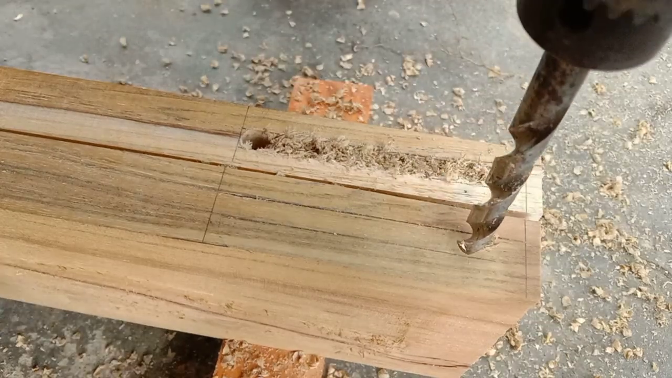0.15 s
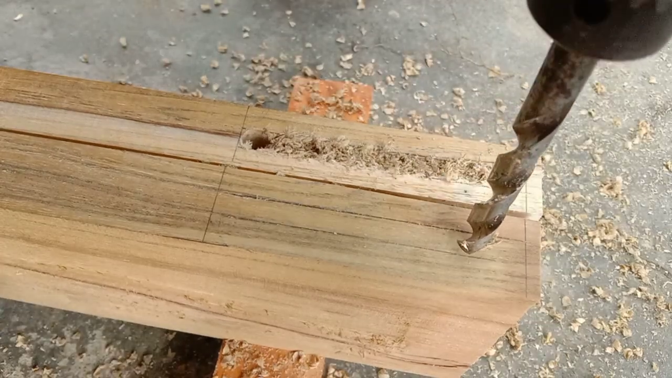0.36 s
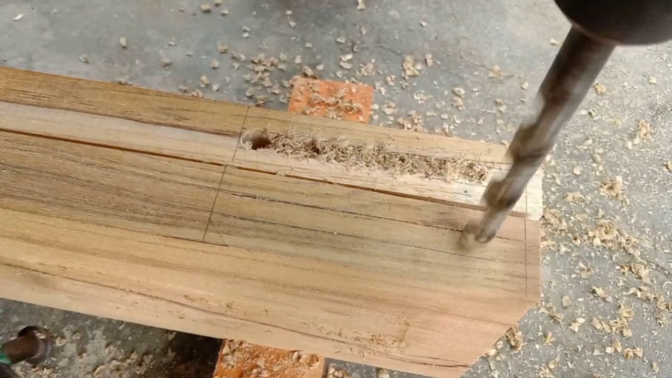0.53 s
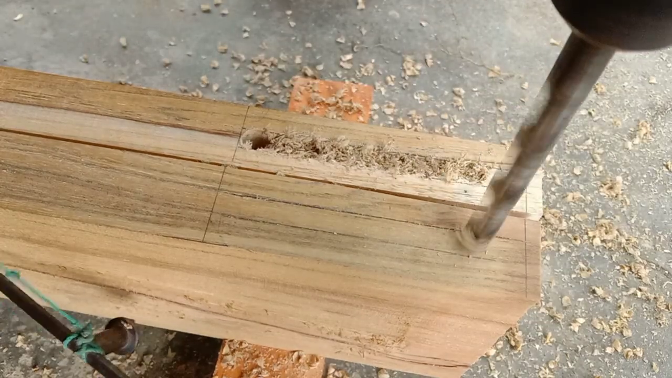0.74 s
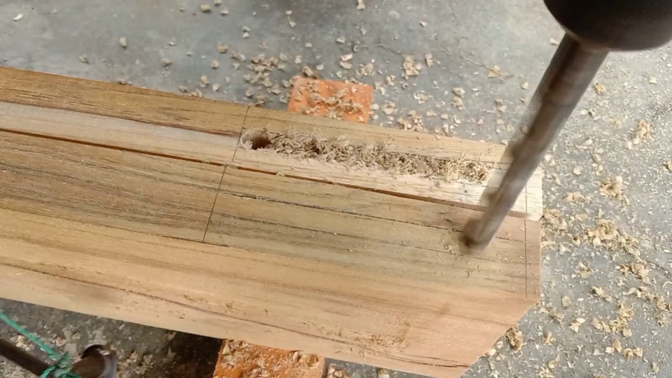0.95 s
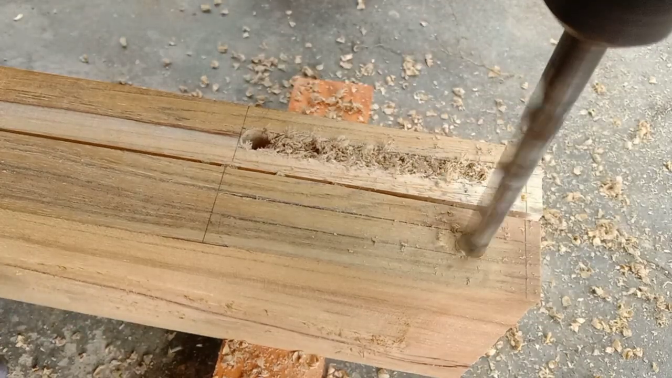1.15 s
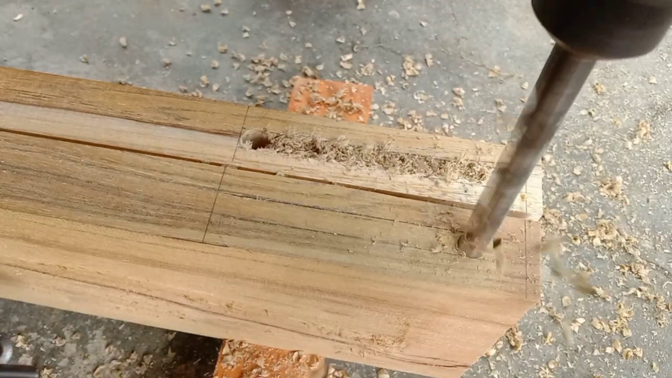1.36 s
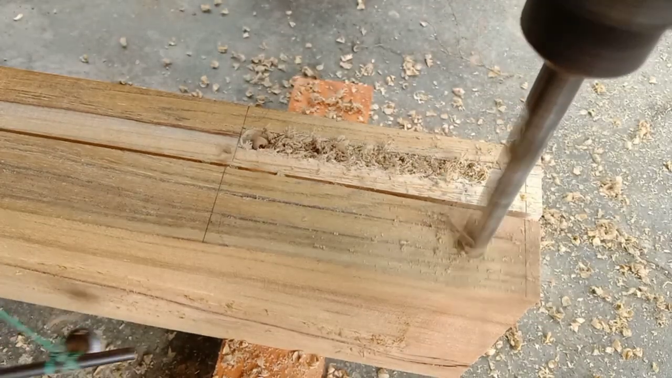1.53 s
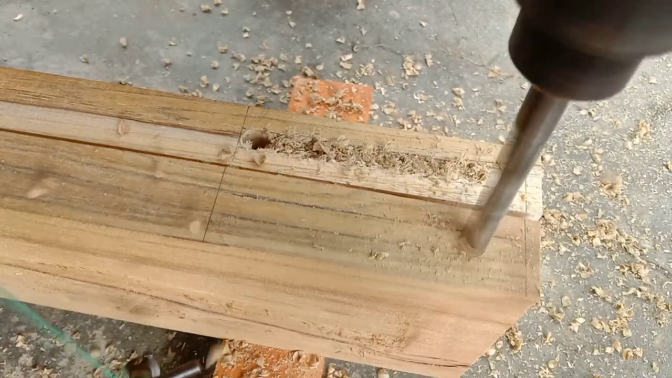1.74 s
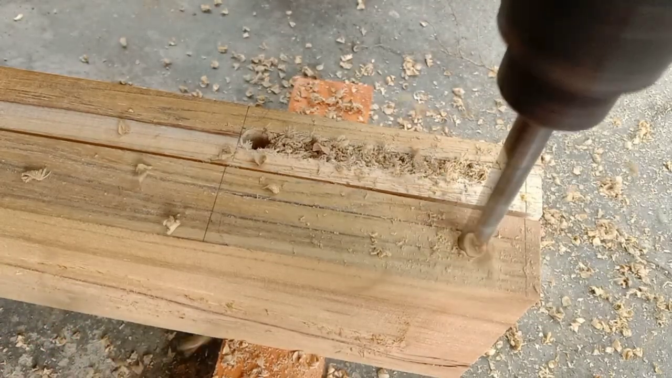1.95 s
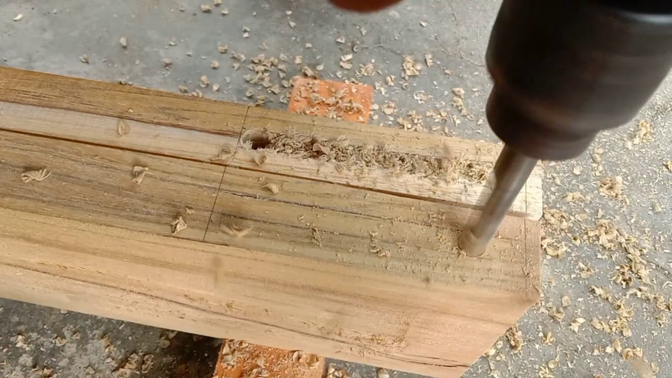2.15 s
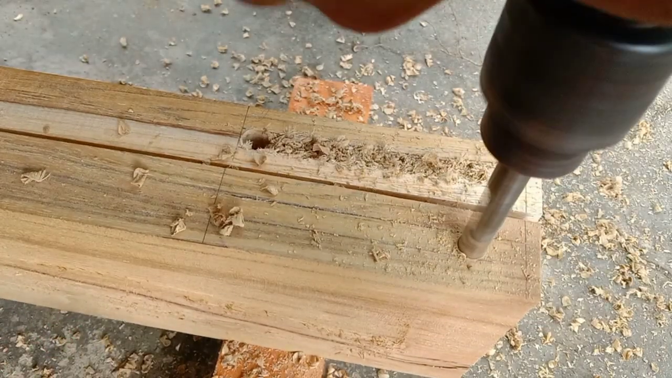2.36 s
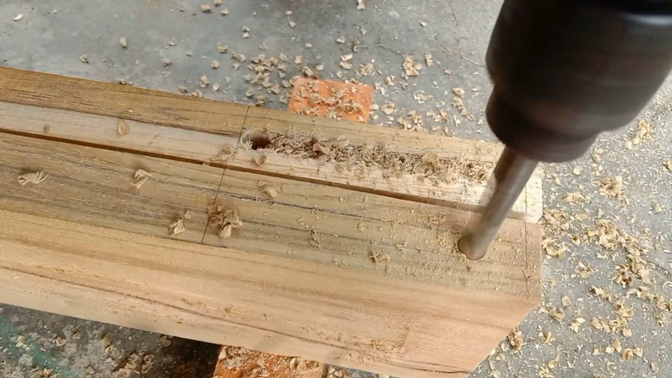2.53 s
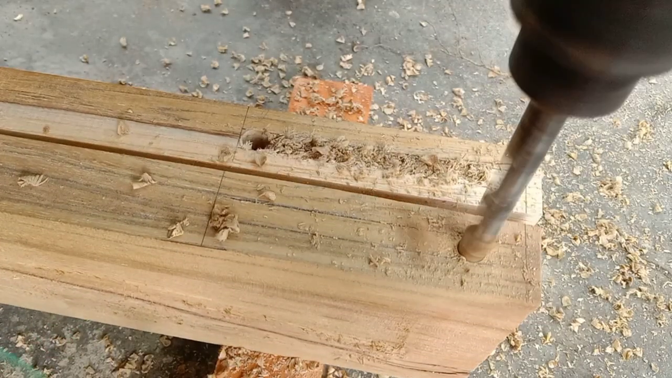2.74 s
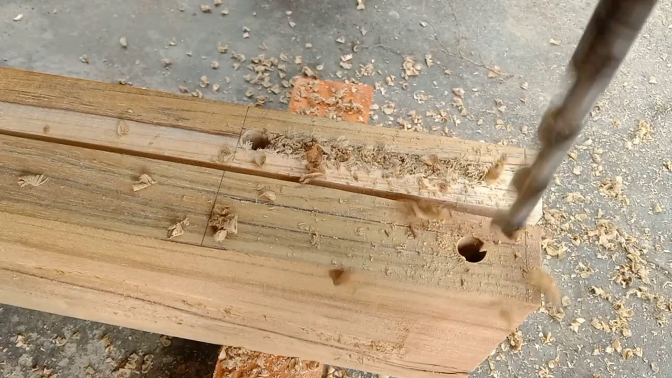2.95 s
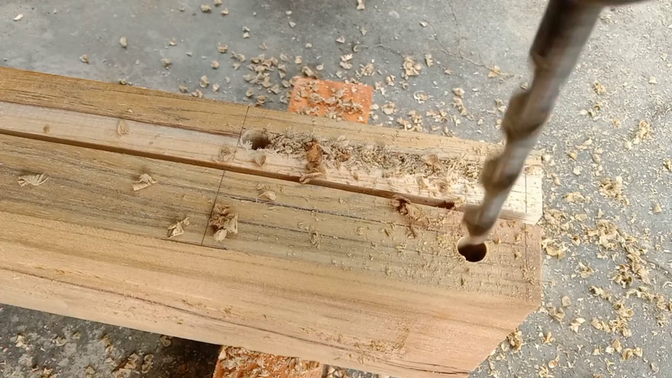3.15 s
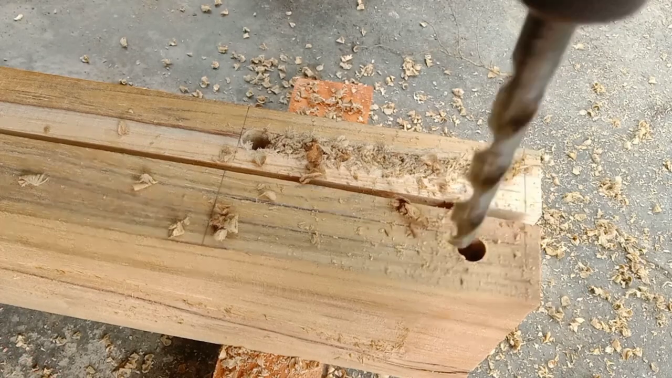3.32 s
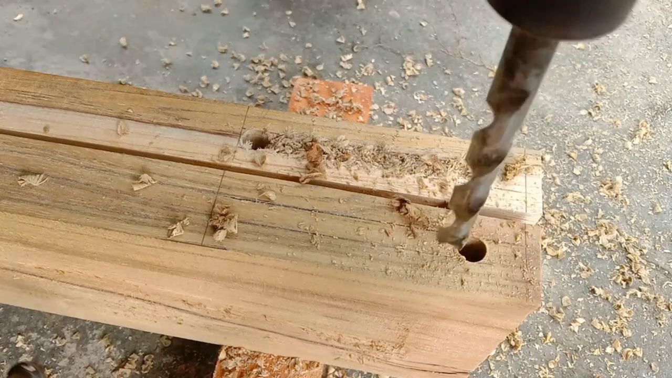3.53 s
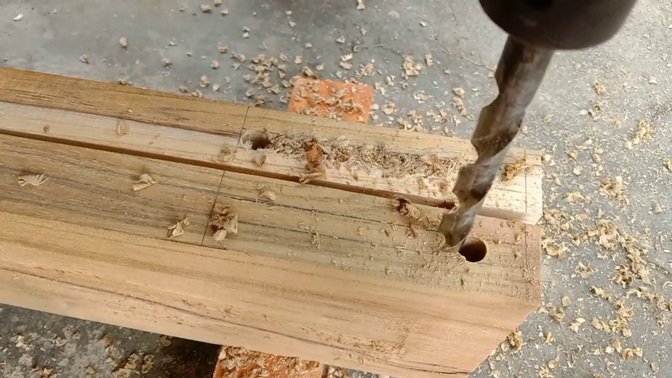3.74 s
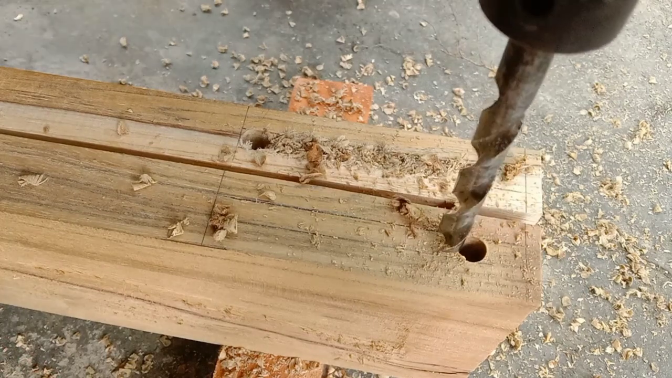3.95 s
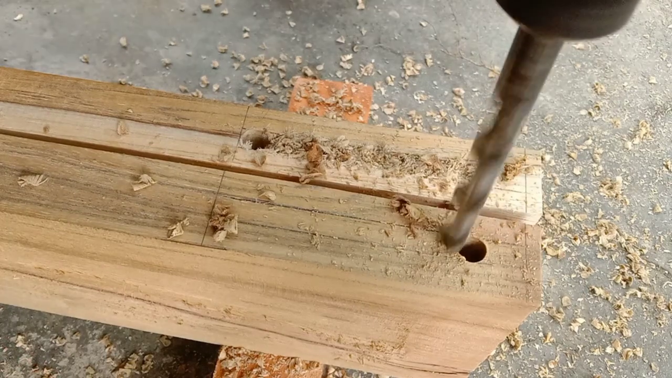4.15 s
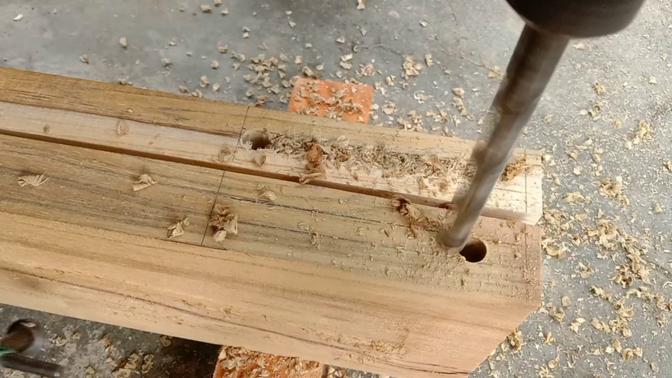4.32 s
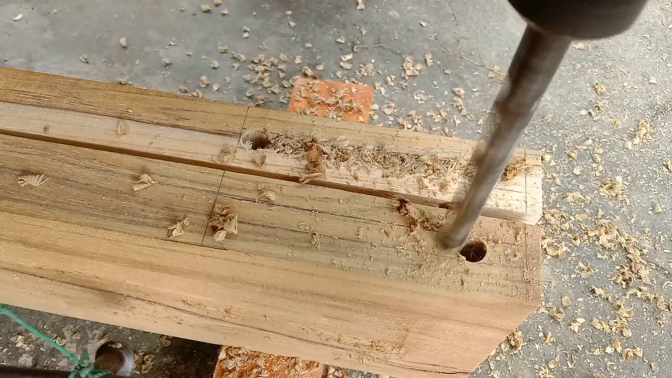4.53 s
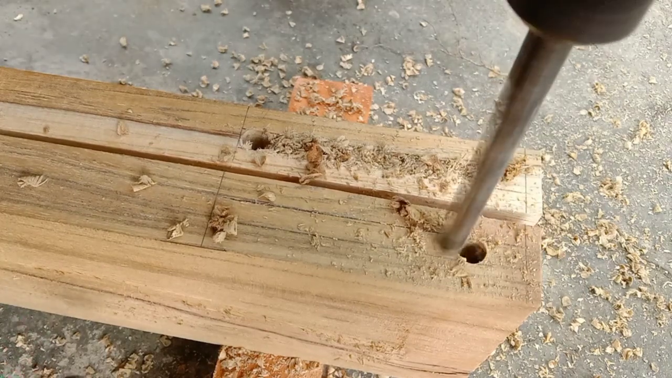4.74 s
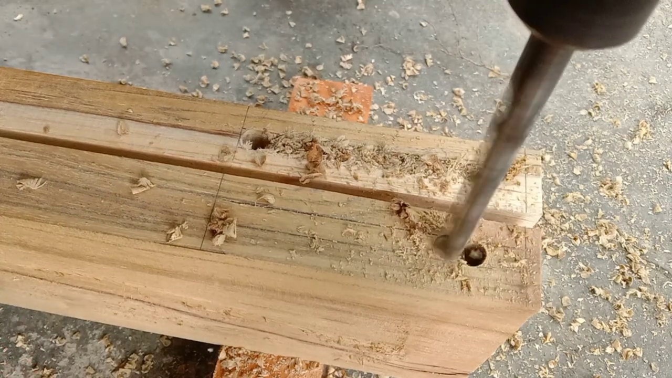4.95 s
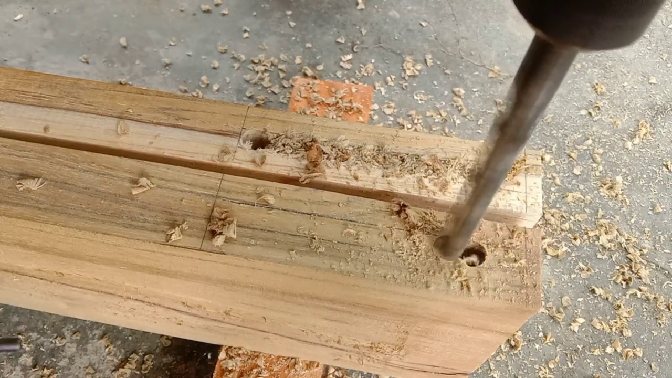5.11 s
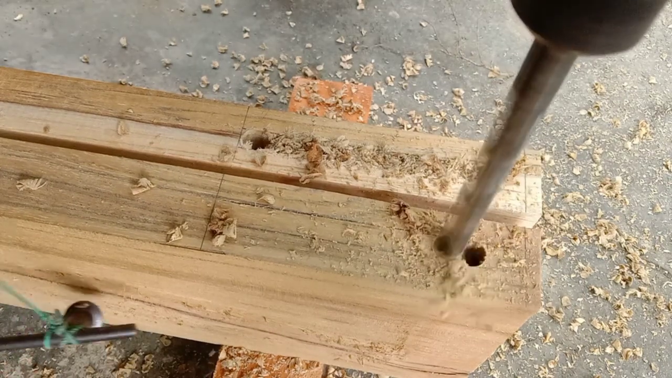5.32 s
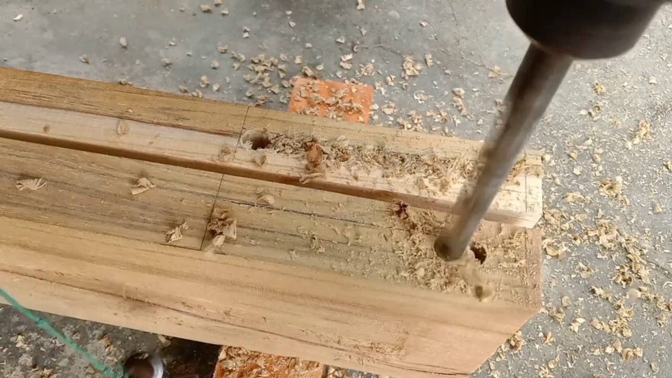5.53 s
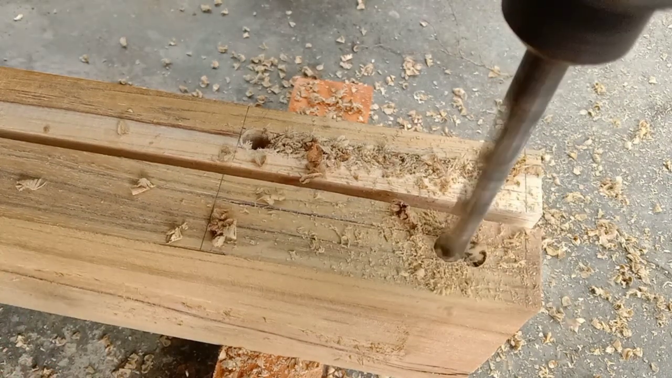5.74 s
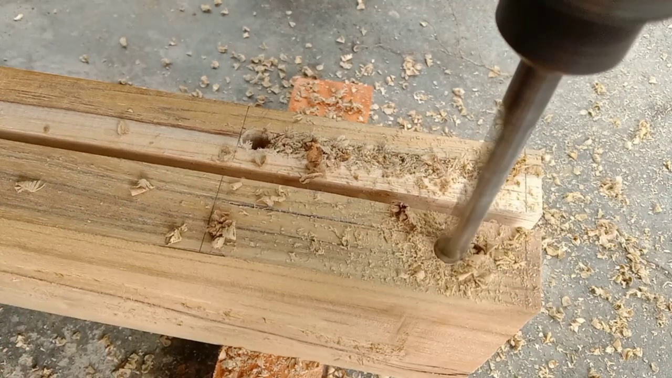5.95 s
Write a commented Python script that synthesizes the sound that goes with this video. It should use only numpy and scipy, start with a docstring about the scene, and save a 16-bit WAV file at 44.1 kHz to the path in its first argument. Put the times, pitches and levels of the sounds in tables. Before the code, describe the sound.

A quiet yard opens with faint, distant horn-like tones and soft wind on the microphone. At about 0.55 seconds a trigger clicks and a corded drill starts close by, its whine climbing until 1.3 seconds over grinding gears and a bright hiss. As the bit bores into a timber beam with a low growl, the pitch sags, lifts briefly near 2.5 seconds, then drops away. Around 3 seconds the bit comes out and the gears rattle loose as the motor coasts, thinning to small ticks that end by 3.8 seconds. Light wind puffs and one very faint far tone fill the short pause. At about 4.1 seconds the trigger clicks again, the gears knock, and the drill rises to full speed by 5 seconds. It keeps whining, hissing and grinding through the wood, dipping slightly, until the end at about 6 seconds.

```python
"""A corded drill bores two holes in a timber beam, outdoors, close to a small microphone.
Far horn-like tones and wind puffs open on a quiet yard. The trigger clicks and mains current jerks the
gears up to speed: teeth and commutator bars whine over gear grind and brush hiss. The motor sags in the
wood, the bit comes out near 3 s, and the gears rattle loose as it coasts. Wind and one far tone fill the
pause; near 4 s the trigger clicks again, the gears knock, and the drill bores on to the end."""
import sys
import numpy as np
from scipy import signal
from scipy.fft import rfft, irfft
from scipy.io import wavfile
from scipy.ndimage import uniform_filter1d

SR = 44100
rng = np.random.default_rng(int(sys.argv[2]) if len(sys.argv) > 2 else 0)


def unload_wav(signal):
    """Save mono or channel-first audio to the path in sys.argv[1] as 16-bit WAV at rate SR, clipped to [-1, 1]."""
    wavfile.write(
        sys.argv[1],
        SR,
        np.round(np.clip(np.atleast_2d(signal).T, -1, 1) * 32767).astype(np.int16),
    )


N = 268128
TIME = np.arange(N) / SR
TOP_HZ = 15550

# clank of the casing when slack gears or the switch ring it: (frequency [Hz], level [dB])
CLANK_SPECTRUM = [(550, -18.5), (1050, -0.5), (1500, -8.5), (2100, -21), (3000, -3.5), (3600, -30.5),
                  (4200, -38.5)]


def amp(db):
    """dB to gain."""
    return 10 ** (np.asarray(db) / 20)


def unit_rms(x):
    """Scales to rms 1."""
    return x / np.sqrt(np.mean(x ** 2) + 1e-20)


def level_at(spectrum, hz):
    """Level of a spectrum in dB, 25 dB down beyond its ends."""
    freqs, db = np.transpose(spectrum)
    return np.interp(np.log(hz + 1), np.log(freqs + 1), db, db[0] - 25, db[-1] - 25)


def curves(rows):
    """Each column after the time as a curve over the scene."""
    times, *columns = np.transpose(rows)
    return [np.interp(TIME, times, column) for column in columns]


def add(mix, start, sound):
    """Mixes a sound in at start seconds."""
    part = mix[round(start * SR):][:len(sound)]
    part += sound[:len(part)]


def drift(samples, size=N):
    """Random wander of rms 1, smoothed over that many samples."""
    return unit_rms(uniform_filter1d(uniform_filter1d(rng.standard_normal(size), samples), samples))


def noise(spectrum, grain_db=0., bursts=1):
    """Coloured noise of rms 1; grain makes single samples stand out, bursts shape it before it rings."""
    source = rng.standard_normal(N) * bursts * amp(grain_db * np.minimum(rng.exponential(1, N), 4))
    colour = amp(level_at(spectrum, np.fft.rfftfreq(N, 1 / SR)))
    return unit_rms(irfft(rfft(source) * colour, N))


def whine(tooth_hz, partials, flutter_db):
    """Wavering, fluttering sines, given as (multiple of the tooth rate, level in dB)."""
    cycles = np.cumsum(tooth_hz * (1 + .002 * drift(150) + .0008 * drift(1500))) / SR
    out = np.zeros(N)
    for order, db in partials:
        flutter = 2 * np.tanh((drift(1400) + drift(110)) / 2)
        tone = np.sqrt(2) * np.sin(2 * np.pi * (order * cycles + rng.random()))
        out += amp(db + flutter_db * flutter) * (order * tooth_hz < TOP_HZ) * tone
    return out


def yard():
    """A faint bed of outdoor air that drops near 4 s."""
    # colour of the air: (frequency [Hz], level [dB])
    spectrum = [(120, -34.5), (200, -13), (581, -10), (762, -10), (1330, 0), (2440, -14), (7800, -31),
                (9000, -44.5), (11700, -66.5), (19800, -120)]
    # fader of the bed: (time [s], level [dB])
    fader = [(0, -73), (3.98, -73.5), (4.02, -83)]
    return amp(curves(fader)[0]) * noise(spectrum)


def far_tones():
    """Horn-like harmonic notes that waver and flicker with distance."""
    # notes: (start [s], end [s], pitch [Hz], level [dB])
    notes = [(0, 0.297, 511, -55), (0, 0.328, 476, -59), (0, 0.116, 455, -62), (0.235, 0.421, 450, -58.5),
             (0.352, 0.475, 356, -61), (3.767, 3.9, 452, -68)]
    # colour of their harmonics: (frequency [Hz], gain [dB])
    colour = [(400, -16), (900, -14), (1400, -3), (1900, -32.5), (2700, -22.5), (3200, -30.5), (4300, -120)]
    out = np.zeros(N)
    for start, end, hz, db in notes:
        size = round((end - start) * SR)
        cycles = np.cumsum(hz * (1 + .007 * drift(900, size))) / SR
        note = np.zeros(size)
        for k in range(1, 10):
            flicker_db = 8 * np.tanh(drift(900, size))
            note += amp(level_at(colour, k * hz) + flicker_db) * np.sin(2 * np.pi * k * cycles)
        add(out, start, amp(db) * note * signal.windows.tukey(size, .4))
    return out


def wind():
    """Puffs of air rumble on the microphone over a faint steady breeze."""
    # puffs: (centre [s], length [s], level [dB])
    puffs = [(0.02, 0.15, -56), (0.363, 0.41, -63.5), (1.024, 0.32, -52), (1.3, 0.089, -56),
             (1.52, 0.11, -59), (1.88, .14, -62), (2.381, .45, -58), (3.11, 0.092, -47.5),
             (3.47, 0.088, -45), (3.789, 0.089, -54), (3.945, 0.087, -51.5), (4.27, 0.072, -55.5),
             (4.629, 0.5, -50.5), (5.03, .1, -54), (5.4, 0.34, -56), (5.851, 0.52, -56.5)]
    # rumble: (frequency [Hz], level [dB])
    spectrum = [(12, -59.5), (20, -24.5), (60, -0.5), (81, 3), (110, -3.5), (146, -23.5), (260, -33.5),
                (340, -73), (570, -120)]
    swell = sum(amp(db) * np.exp(-(2 * (TIME - centre) / length) ** 4) for centre, length, db in puffs)
    return (amp(-76) + swell) * noise(spectrum)


def trigger_clicks():
    """Each click of the switch is a bright snap over a clank of the casing."""
    # clicks: (time [s], level [dB])
    clicks = [(0.552, -45), (0.559, -34), (4.13, -27.5)]
    snap_t60_s, clank_t60_s = .08, .11
    out, t = np.zeros(N), np.arange(2500) / SR
    casing = noise(CLANK_SPECTRUM)[:len(clicks) * len(t)].reshape(len(clicks), -1)
    for (start, db), ringing in zip(clicks, casing):
        snap = amp(-12.5 - 60 * t / snap_t60_s) * rng.standard_normal(len(t))
        clank = amp(-60 * t / clank_t60_s) * np.minimum(t / .0051, 1) * ringing
        add(out, start, amp(db) * (snap + clank))
    return out


def gear_knocks():
    """Gears take up their slack with short dull rings; the last turns only tick."""
    # knocks: (time [s], level [dB])
    knocks = [(2.986, -12), (2.998, -15), (3.015, -15), (3.049, -21), (3.061, -16.5), (3.07, -13.5),
              (3.101, -18.5), (3.131, -18.5), (3.138, -17), (3.164, -19.5), (3.205, -22), (3.211, -22),
              (3.244, -24.5), (3.262, -30), (3.291, -27), (3.326, -28), (3.34, -24), (3.374, -21.5),
              (3.426, -24), (3.464, -24), (3.485, -29), (4.175, -14.5), (4.182, -18), (4.192, -12),
              (4.201, -15), (4.224, -19), (4.237, -31)]
    # casing modes: (frequency [Hz], level [dB], t60 [s])
    casing_modes = [(940, 0, .017), (1400, 2, 0.009), (2975, -11, 0.009)]
    out, t = np.zeros(N), np.arange(2500) / SR
    attack = (1 - np.exp(-t / .0012)) ** 2

    def ring(modes):
        """Each knock lands elsewhere and shifts the modes."""
        detune = 1 + .05 * rng.standard_normal()
        return attack * sum(amp(db - 60 * t / t60) * np.sin(2 * np.pi * hz * detune * t)
                            for hz, db, t60 in modes)

    for start, db in knocks:
        add(out, start, amp(db) * ring(casing_modes))
    tick_span_s, tick_gap_s = (3.535, 3.75), .014
    for start in np.arange(*tick_span_s, tick_gap_s):
        db = np.interp(start, tick_span_s, [-34, -45]) + 2.8 * np.tanh(rng.standard_normal())
        jitter = .35 * tick_gap_s * rng.standard_normal()
        add(out, start + jitter, amp(db) * ring(casing_modes[1:]))  # ticks miss the lowest mode
    return out


def wood_cut(load_db, restart_s):
    """The beam growls under the bit with the load, and falls away between the holes."""
    # the beam: (frequency [Hz], level [dB])
    spectrum = [(76, -28.5), (130, -13.5), (198, -12), (387, -2), (434, -3.5), (700, 4.5), (910, -30.5),
                (1540, -120)]
    bit_out = (TIME > 2.92) & (TIME <= restart_s)
    return amp(load_db - 17 - 23 * bit_out + .6 * drift(900)) * noise(spectrum)


def brush_hiss(tooth_hz, hiss_db, sizzle_db):
    """Brushes and cooling air hiss, topped by a flickering sizzle and thin whistles."""
    # hiss: (frequency [Hz], level [dB])
    spectrum = [(2530, -53), (4300, -31), (4810, 9.5), (5440, 9), (6430, 11.5), (7680, 11.5), (10100, -0.5),
                (10900, -12.5), (13300, -16.5), (15500, -9.5)]
    # brush whistles: (multiple of the tooth rate, level against the sizzle [dB])
    whistles = [(7, -13), (8, -9), (10, -10)]
    air = noise(spectrum, grain_db=4) * amp(.73 * drift(400))
    body = signal.oaconvolve(air, signal.firwin(61, 10700, fs=SR), "same")
    sizzle = amp(sizzle_db + 1.7 * drift(250)) * unit_rms(air - body)
    partials = [(k, sizzle_db + db - 40 * (k * tooth_hz < 9000)) for k, db in whistles]
    return amp(hiss_db) * unit_rms(body) + sizzle + whine(tooth_hz, partials, flutter_db=3)


def commutator_overtones(tooth_hz, bar_db):
    """Passing bars sing uneven overtones, the first boosted, with a squeal around 10 kHz."""
    # how the casing passes these tones: (frequency [Hz], gain [dB])
    casing = [(700, -14), (1000, -6), (2000, -4), (3200, -5), (4200, -20), (5000, -3), (6800, 0),
              (8000, -3), (10000, -12), (11500, -24), (15500, -24)]
    bars_per_tooth, squeal_order = 3, 10
    orders = bars_per_tooth * np.arange(2, 15)
    trims_db = [3, *(3 * np.tanh(rng.standard_normal(12)))]
    partials = [(k, bar_db + db + level_at(casing, k * tooth_hz)) for k, db in zip(orders, trims_db)]
    squeal_hz = squeal_order * tooth_hz
    off_band = (squeal_hz < 9300) | (squeal_hz > 10700)
    partials.append((squeal_order, bar_db - 8 - 40 * off_band))
    return whine(tooth_hz, partials, flutter_db=5.2)


def gear_grind(tooth_hz, load_db, jerk_depth):
    """Loaded gears grind evenly; jerked or slowly coasting, they run slack and ring the casing."""
    # gearbox: (frequency [Hz], level [dB])
    spectrum = [(380, -43), (650, -2), (741, -7), (804, 6), (995, 11.5), (1310, 16), (2100, 8.5),
                (3180, 10.5), (4040, -1.5), (4600, -1), (5980, -47), (10100, -120)]
    # each half wave of the mains jerks the rotor, so the grind comes in uneven bursts
    pulse_hz = 100
    pulses = np.exp(2.4 * np.cos(2 * np.pi * pulse_hz * (TIME - .009)))
    jerks = unit_rms(pulses * amp(3 * np.tanh(drift(300))))
    bursts = 1 - jerk_depth + jerk_depth * jerks
    grind = amp(.8 * drift(540)) * noise(spectrum, grain_db=1.24, bursts=bursts)
    rattle = noise(CLANK_SPECTRUM, grain_db=3, bursts=bursts)
    slack = .85 * np.maximum(jerk_depth / .65, np.clip(1.6 - tooth_hz / 300, 0, 1))
    return amp(load_db) * (np.sqrt(1 - slack ** 2) * grind + slack * rattle)


def gear_and_bar_whine(tooth_hz, accel, load_db, bar_db, jerk_depth, flutter):
    """Gears whine at 1, 2 and 4 times the tooth rate; the commutator's lowest tone sits at 3 times."""
    # how the casing passes these tones: (frequency [Hz], gain [dB])
    casing = [(400, -55), (800, -35.5), (1050, -27), (1300, -29), (1620, -41.5), (2200, -48.5), (2600, -41),
              (3050, -23.5), (3300, -21.5), (3600, -31), (4200, -41), (4800, -36), (5400, -32.5),
              (6400, -28), (8000, -18)]
    # trims of harmonics 1 (gears), 3 (commutator) and 4 (gears): (gain [dB])
    trims_db = [-1.8, 42, 0]
    # fader of harmonic 2: (time [s], level [dB])
    second_fader = [(.6, -43), (.85, -25.5), (.93, -24), (1.1, -31), (1.27, -32.5), (1.6, -29.5),
                    (1.9, -46), (2.1, -52), (2.42, -54), (2.55, -32), (2.65, -60), (2.73, -32), (2.95, -31),
                    (3.03, -67), (4.15, -84), (4.4, -44), (4.63, -27), (4.9, -35.5), (5.3, -41.5),
                    (6.08, -33)]
    # side tones: (multiple of the tooth rate, level against harmonic 4 [dB])
    side_tones = [(.5, -19), (5, -22)]
    full_load_db, free_hz = -24.5, 420
    parting = 5 * (1 - tooth_hz / free_hz)  # below free_hz the teeth part and the gear whine dies
    contact_db = .18 * (load_db - full_load_db) - 35 * np.clip(parting, 0, 1)
    breakup_db = -90 * np.maximum(jerk_depth - .43, 0)
    # braking in the wood throws the teeth on their other flank
    braking = uniform_filter1d(np.clip(-accel / 2000, 0, 1) ** 2, size=6000, origin=2500)
    drive_db = {1: contact_db + .5 * braking,
                3: bar_db + breakup_db - 35 * (tooth_hz < free_hz) - 12.5 * braking,
                4: contact_db + breakup_db - 11 * braking}
    level_db = {k: drive_db[k] + db + level_at(casing, k * tooth_hz) for k, db in zip(drive_db, trims_db)}
    level_db[2] = curves(second_fader)[0] - 35 * np.clip(parting - 1, 0, 1)
    body = whine(tooth_hz, [(k, level_db[k]) for k in (1, 2, 3)], flutter_db=3.5)
    edge = whine(tooth_hz, [(k, level_db[4] + db) for k, db in [(4, 0), *side_tones]], flutter_db=3)
    return (1 - jerk_depth) ** 2 * body + flutter * edge


def drill():
    """The motor's speed and load drive the cut, the hiss, the grind and the whines."""
    # motor speed, one list a hole: (time [s], tooth rate [Hz])
    speed = [
        [(0.56, 274), (0.66, 644), (0.752, 967), (0.86, 1200), (0.996, 1406), (1.14, 1520), (1.266, 1583),
         (1.348, 1620), (1.582, 1525), (1.896, 1330), (2.156, 1111), (2.244, 1050), (2.394, 995.4),
         (2.464, 1082), (2.575, 1187), (2.642, 1037), (2.742, 721), (2.856, 534.1), (2.946, 427), (3.2, 297.1),
         (3.452, 169), (3.78, 38.1)],
        [(4.17, 340.3), (4.254, 765), (4.344, 1091), (4.466, 1371), (4.626, 1488), (4.792, 1582), (4.908, 1613),
         (5.08, 1640), (5.26, 1651), (5.532, 1641), (5.8, 1589), (6.08, 1526)],
    ]
    # motor effort, one list a hole: (time [s], gear load [dB], hiss [dB], sizzle [dB], commutator [dB])
    effort = [
        [(0.54, -57, -90, -107, -90), (0.57, -22.5, -54, -58, -50), (0.6, -26, -38.5, -55, -55),
         (0.64, -21.5, -38, -50, -40.5), (.8, -24, -34, -53, -41.5), (1.0, -25.5, -33, -49.5, -60),
         (1.5, -26.5, -31.5, -51.5, -46), (1.94, -29.5, -38, -52, -61), (2.3, -33.5, -41, -58, -45),
         (2.5, -29.5, -39.5, -55, -46.5), (2.62, -31.5, -40.5, -56, -52.5), (2.84, -39.5, -49, -69.5, -47),
         (2.94, -40.5, -51.5, -62, -56), (3.02, -40, -38, -51, -45), (3.33, -51.5, -45.5, -51, -48.5),
         (3.54, -56, -49, -64, -63.5), (3.69, -66, -63, -104, -79), (3.78, -81, -81.5, -101, -101)],
        [(4.166, -29, -59, -70, -70), (4.18, -25.5, -41, -50, -61), (4.234, -27, -36, -48, -74),
         (4.33, -31, -40, -54, -41), (4.45, -27, -36.5, -46, -46), (4.7, -27, -32.5, -43.5, -48),
         (5.34, -27, -31.5, -42, -59), (6.08, -28, -34, -38.5, -47)],
    ]
    tooth_hz = uniform_filter1d(curves(np.vstack(speed))[0], size=900)
    load_db, hiss_db, sizzle_db, bar_db = curves(np.vstack(effort))
    running = sum((TIME > run[0][0]) * (TIME <= run[-1][0]) * 1. for run in effort)
    accel = uniform_filter1d(np.gradient(tooth_hz) * SR, 2000)  # Hz per second
    jerk_depth = np.clip(accel / 5500 + .06, 0, .65)  # deepest while the rotor gathers speed
    # a fast flutter of the hiss and high whine, about 43 Hz at full speed
    flutter_hz, flutter_db = tooth_hz / 38, 1.3
    flutter = amp(flutter_db * np.cos(2 * np.pi * np.cumsum(flutter_hz) / SR))
    cut = wood_cut(load_db, restart_s=effort[1][0][0])
    motor = brush_hiss(tooth_hz, hiss_db, sizzle_db) + commutator_overtones(tooth_hz, bar_db)
    grind = gear_grind(tooth_hz, load_db, jerk_depth)
    tones = gear_and_bar_whine(tooth_hz, accel, load_db, bar_db, jerk_depth, flutter)
    return uniform_filter1d(running, 200) * (cut + flutter * motor + grind + tones)


def scene():
    """The drill up front, the yard behind it, in mono."""
    return (yard() + far_tones() + wind() + trigger_clicks() + gear_knocks() + drill())[None]


def record(dry):
    """A steep low-pass trims the highest treble."""
    return signal.oaconvolve(dry, signal.firwin(511, TOP_HZ, window=("kaiser", 9), fs=SR)[None], "same")


dry = scene()
out = record(dry)
unload_wav(out)
```